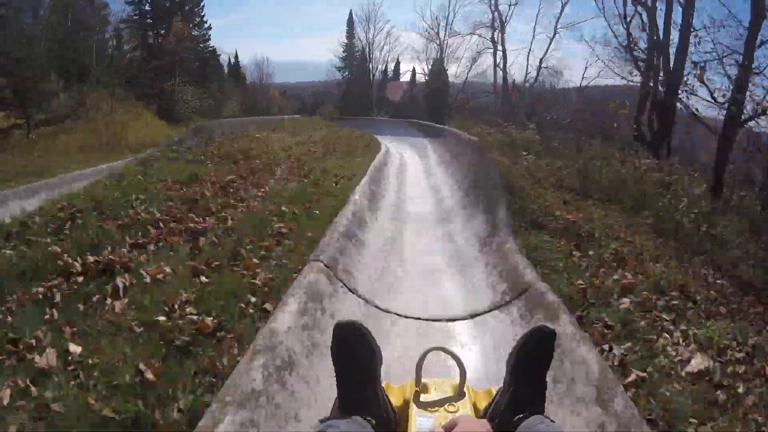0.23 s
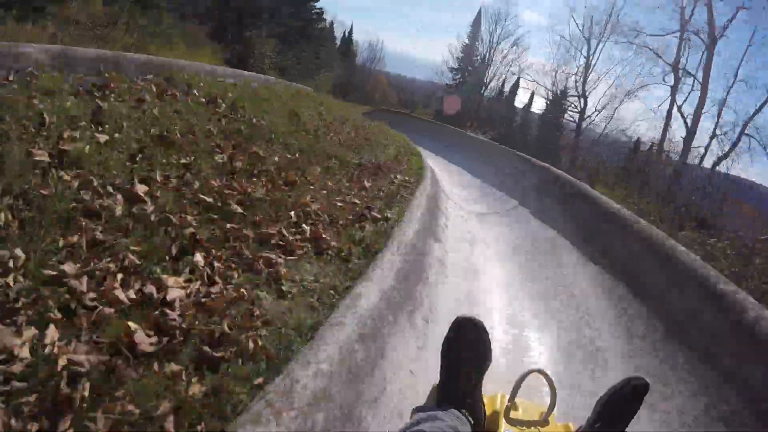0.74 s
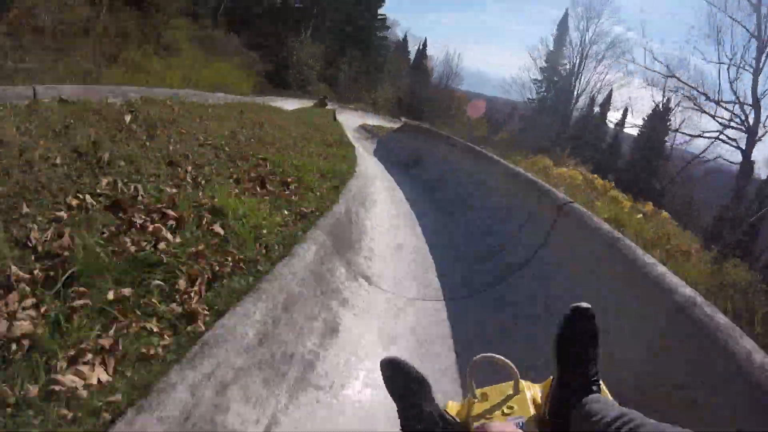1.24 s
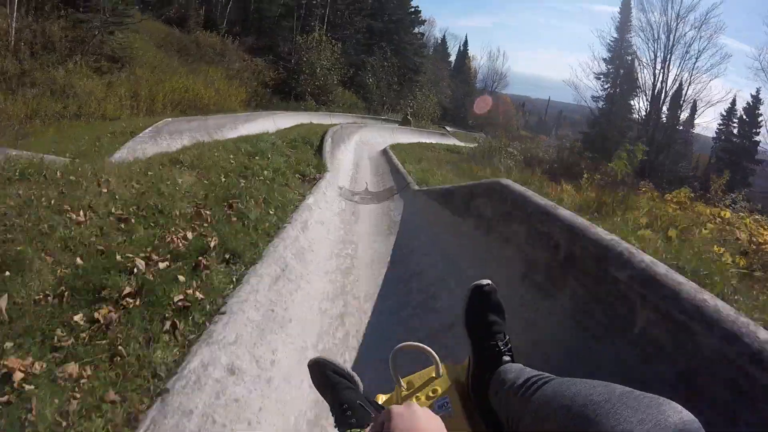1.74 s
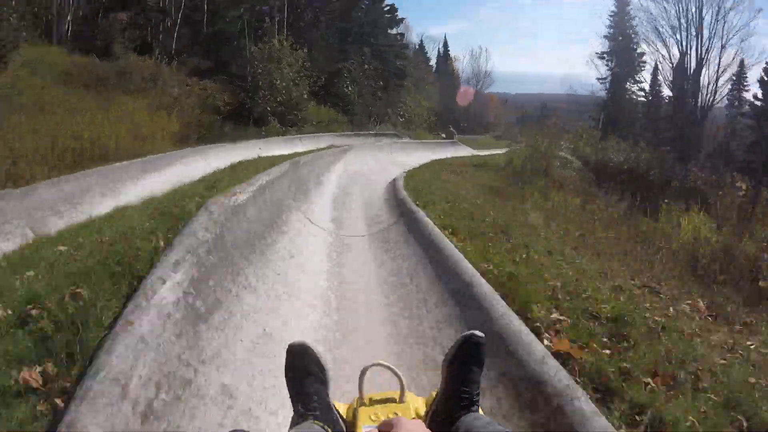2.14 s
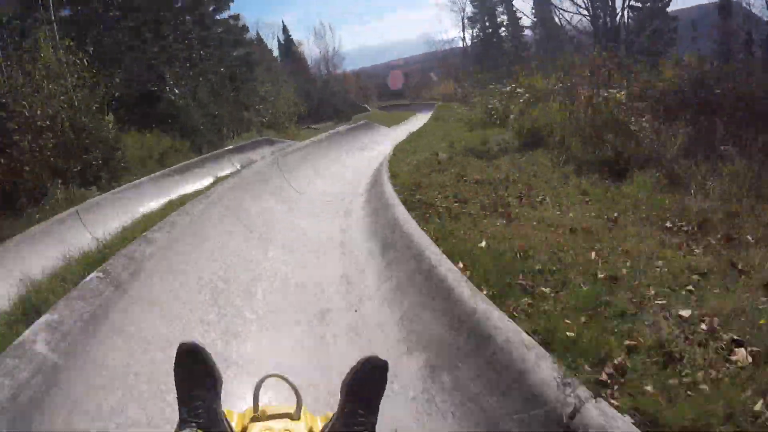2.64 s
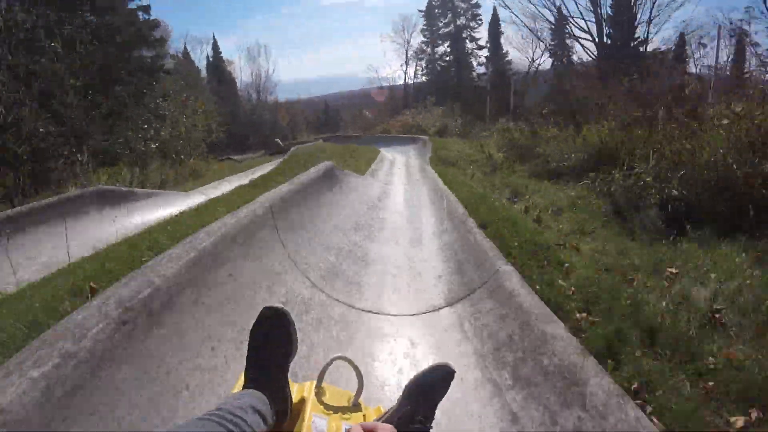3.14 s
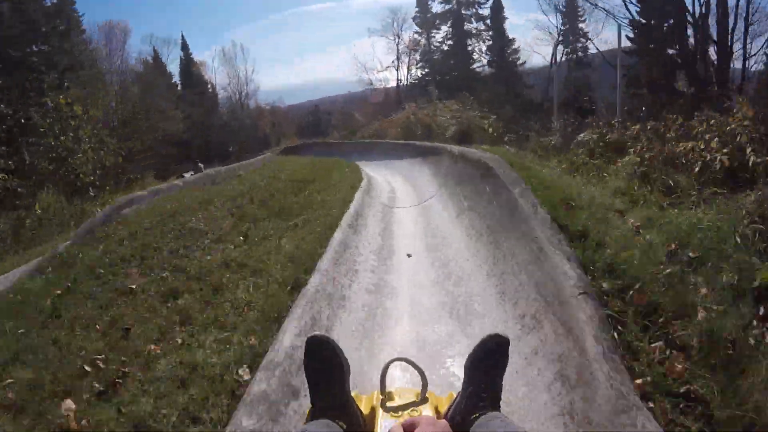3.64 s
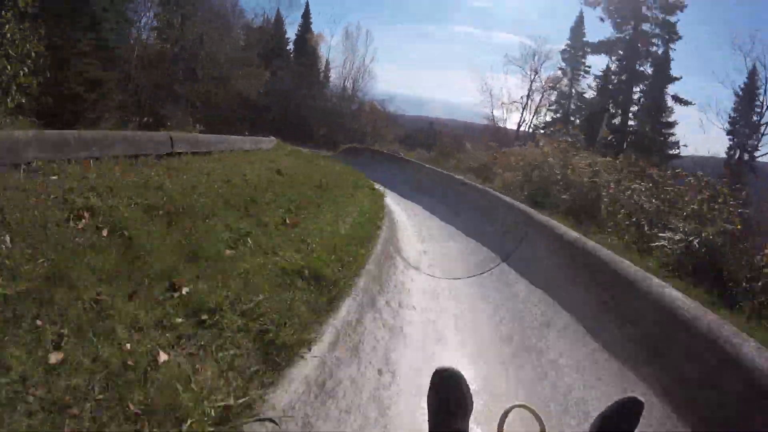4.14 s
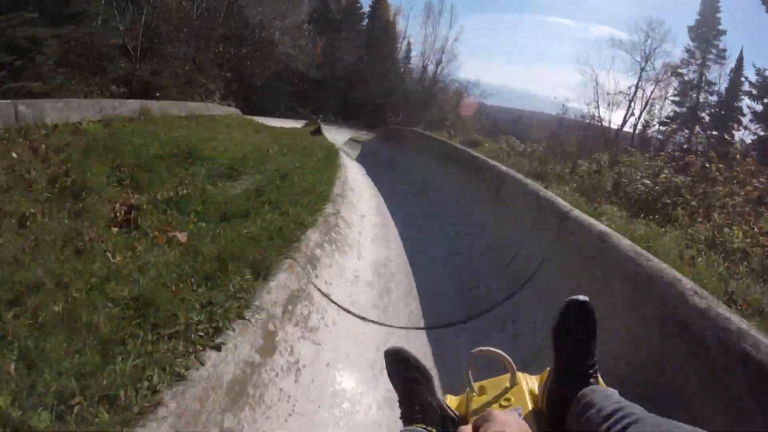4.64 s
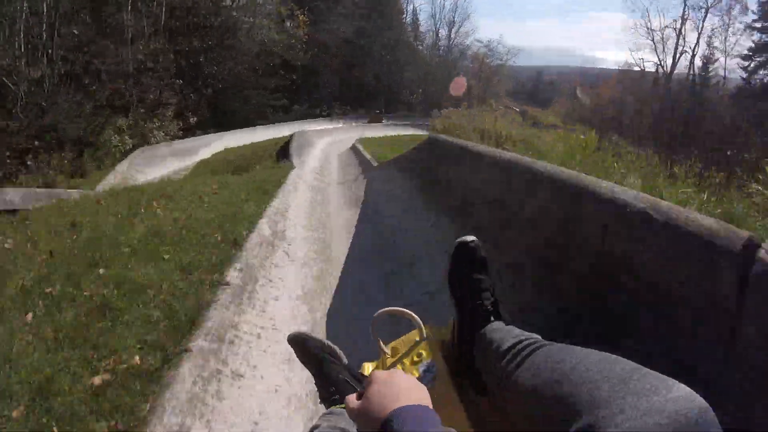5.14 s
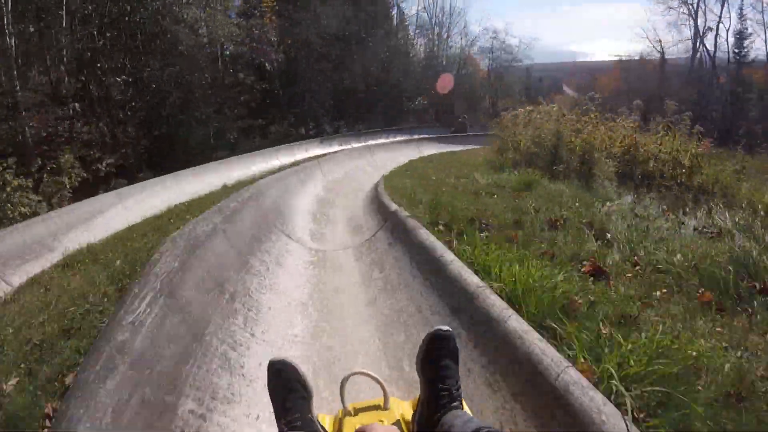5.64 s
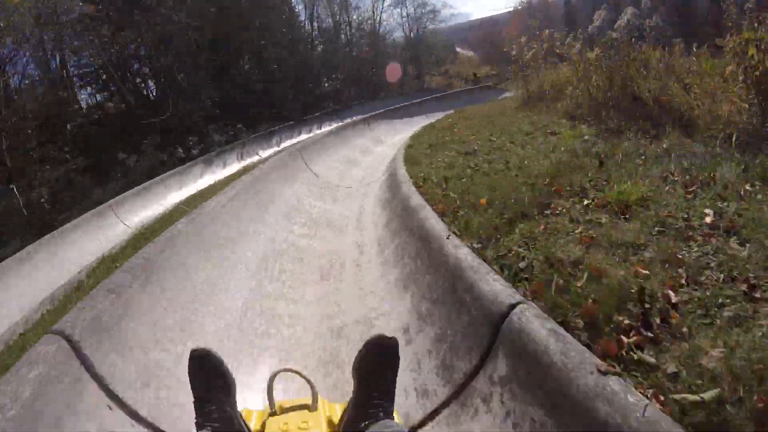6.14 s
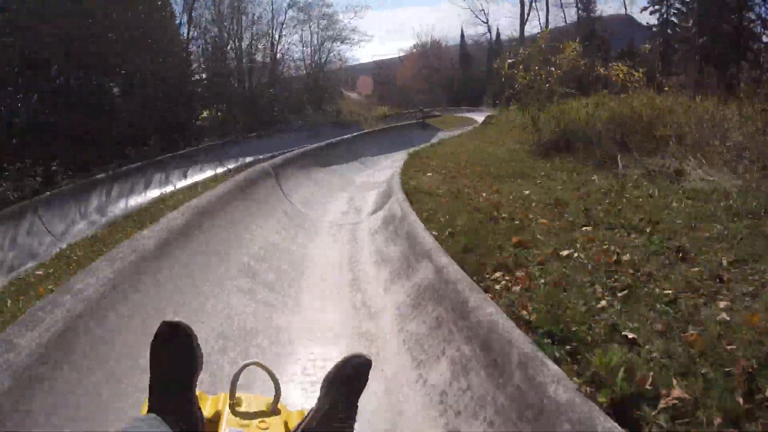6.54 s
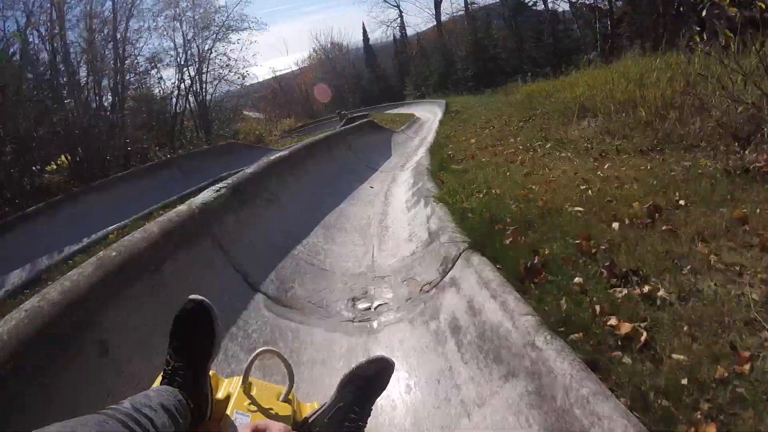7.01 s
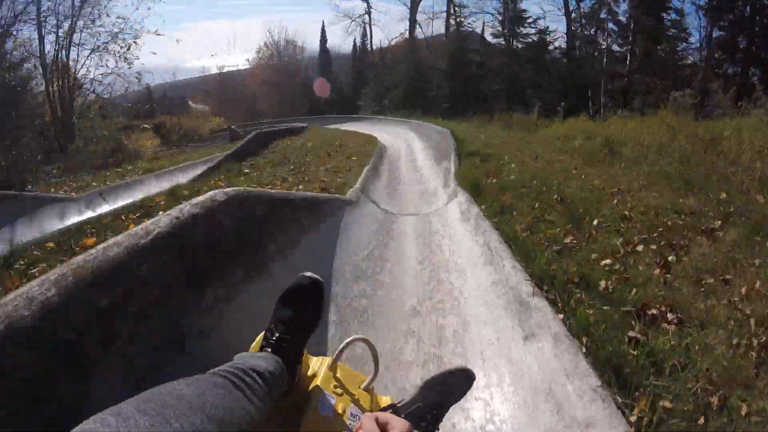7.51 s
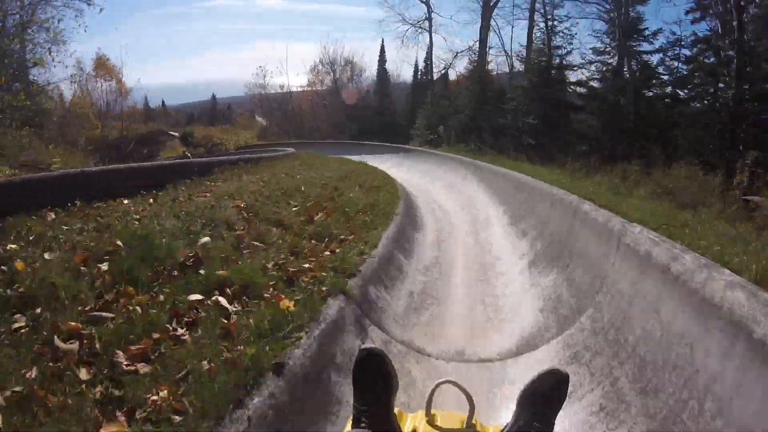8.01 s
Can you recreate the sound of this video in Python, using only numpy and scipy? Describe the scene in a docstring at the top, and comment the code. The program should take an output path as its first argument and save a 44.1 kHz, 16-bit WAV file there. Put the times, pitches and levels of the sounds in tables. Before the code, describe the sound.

Close, dry outdoor sound from a microphone on the rider of a wheeled plastic sled running down concrete. From the start a hollow, uneven rumble and gritty rasp continue without pause, while low wind gusts thud and flutter, strongest in the first second, near 2.8 and around 4. Joints knock at 0.5, 1.1, 1.45 and 2.2 s, with a soft shudder just after. From 2.6 to 3.6 rough scrapes, rattles and stone clicks crowd together. A thump at 4.45 leads to a very hard, clipped knock at 4.85; the level ducks and slowly returns. Two thin sandy skids hiss near 5.45 and 5.5 with a wind puff. Clustered knocks and rattles come at 6.1-6.7, scrapes near 7, then the hardest, ringing plastic bang at 7.2 and another knock at 7.5. A double tap near 7.95, wind rising, still rolling at about 8.3.

```python
"""Riding a wheeled plastic sled fast down a concrete chute, with the microphone on the rider, about 8 s.
From the start filtered taps rumble in the hollow shell, grit rasps, and turbulent noise buffets the microphone.
Damped resonances thump at the joints, a shudder just after; loose parts rattle and runners scrape.
Past the middle comes the first very hard knock, then two sandy skids, then the hardest knock of all.
Loud knocks duck the microphone's gain, which recovers slowly; the hardest overload it. It ends still rolling."""
import sys
import numpy as np
from scipy import signal
from scipy.fft import rfft, irfft
from scipy.io import wavfile
from scipy.ndimage import uniform_filter1d

SR = 44100
rng = np.random.default_rng(int(sys.argv[2]) if len(sys.argv) > 2 else 0)


def transcribe(signal):
    """Save signal, clipped to [-1, 1], as a 16-bit WAV file at the path in sys.argv[1]."""
    frames = np.atleast_2d(signal).T
    limited = np.clip(frames, -1, 1)
    pcm = np.round(limited * 32767).astype(np.int16)
    wavfile.write(sys.argv[1], SR, pcm)


N = 364707
TIME = np.arange(N) / SR


def gain_of(db):
    """Decibels as an amplitude factor."""
    return 10 ** (np.asarray(db) / 20)


def evened(x):
    """Scale to unit RMS."""
    return x / np.sqrt(np.mean(x ** 2) + 1e-20)


def steadied(x, steady_s):
    """Divide out the running RMS, so that only level changes faster than the given time remain."""
    power = abs(uniform_filter1d(x ** 2, int(steady_s * SR)))
    return x / np.sqrt(power + 1e-9)


def levels(rows):
    """Each dB column of a curve as a gain for every sample."""
    s, *columns = np.transpose(rows)
    return [gain_of(np.interp(TIME, s, column)) for column in columns]


def swells(rows):
    """Bell-shaped swells of gain, each down to 1/e one half length from its height."""
    return sum(gain_of(db) * np.exp(-((TIME - s) / half) ** 2) for s, half, db in rows)


def add(mix, s, sound):
    """Lay a short sound into the mix at the given time."""
    part = mix[max(round(s * SR), 0):][:len(sound)]
    part += sound[:len(part)]


def colour(x, points, size=8192):
    """Causal minimum-phase filter of unit energy with the given spectrum."""
    hz, db = np.transpose(points)
    f = abs(np.fft.fftfreq(size, 1 / SR))
    log_gain = np.log(gain_of(np.interp(np.log(f + 1), np.log(hz), db)))
    minimum_phase = np.exp(np.conj(signal.hilbert(log_gain)))
    response = np.fft.ifft(minimum_phase).real[:size // 2]
    return signal.oaconvolve(x, response / np.linalg.norm(response))[:len(x)]


def wander(hz):
    """Slow random drift of unit RMS, fading out above the given rate."""
    f = np.fft.rfftfreq(N, 1 / SR)
    spectrum = rfft(rng.standard_normal(N)) / (1 + (f / hz) ** 4)
    return evened(irfft(spectrum, N))


def grains(per_s, spread_db):
    """Tiny impacts at random moments, a few much larger than the rest."""
    size = gain_of(spread_db * np.minimum(rng.exponential(1, N), 4))
    struck = rng.random(N) < per_s / SR
    return evened(size * rng.choice([-1., 1.], N) * struck)


def strike_shape(rise_s, decay_s, size):
    """Envelope of a blow: a quick rise and an exponential fall, with a peak of 1."""
    t = np.arange(size) / SR
    shape = (1 - np.exp(-t / rise_s)) ** 2 * np.exp(-t / decay_s)
    return shape / shape.max()


def burst(rise_s, decay_s, size=4096):
    """A puff of noise that swells and dies."""
    return strike_shape(rise_s, decay_s, size) * rng.standard_normal(size)


def pluck(hz, rise_s, decay_s, size=6144):
    """A struck resonance that rises quickly and rings away."""
    t = np.arange(size) / SR
    return strike_shape(rise_s, decay_s, size) * np.sin(2 * np.pi * hz * t)


def chatter(rise_s, decay_s, per_s, size=4096):
    """A quick run of separate tiny hits that dies away."""
    hits = rng.choice([-1., 1.], size) * (rng.random(size) < per_s / SR)
    return strike_shape(rise_s, decay_s, size) * hits * np.sqrt(SR / per_s)


def ring(hz, swell_s, size=4096):
    """A heavily damped resonance that swells and dies."""
    t = np.arange(size) / SR
    shape = (t / swell_s) ** 2 * np.exp(-t / swell_s)
    return shape / shape.max() * np.sin(2 * np.pi * hz * t)


def eddies(spectrum, steady_s):
    """Turbulent pressure: coloured noise of evened strength."""
    return steadied(colour(rng.standard_normal(N), spectrum), steady_s)


def rolling(spectrum, per_s, spread_db, steady_s):
    """A stream of tiny impacts heard through a body, of evened strength."""
    return steadied(colour(grains(per_s, spread_db), spectrum), steady_s)


# strength of the wind over the microphone: (time [s], relative level [dB])
WIND_STRENGTH = [(0, -16.5), (.11, -25), (.38, -17), (.58, -18.5), (.75, -19.5), (1.05, -20.5), (1.3, -24),
                 (1.65, -20), (2.05, -22.5), (2.5, -23), (2.77, -17), (3.05, -22), (3.3, -22.5),
                 (3.52, -20), (3.95, -17), (4.25, -16.5), (4.55, -19.5), (4.8, -19), (4.95, -23),
                 (5.3, -29), (5.52, -17.5), (5.85, -28), (6.2, -22.5), (6.6, -25), (7.1, -24.5),
                 (7.5, -25.5), (8, -22), (8.2, -17)]
# gusts rushing close past the microphone: (time of height [s], half length [s], level before flicker [dB])
GUSTS = [(0.692, 0.032, -42), (4.24, 0.17, -44), (4.56, 0.032, -36.5), (8.26, 0.045, -55)]
# spectra of large eddies, small eddies and rushing air: (frequency [Hz], relative density [dB per Hz])
BUFFET_SPECTRUM = [(8, -10.5), (20, -1), (32, -4), (58, -1), (80, -8.5), (120, -7.5), (300, -67),
                   (1500, -115)]
FLUTTER_SPECTRUM = [(40, -23), (70, 4), (100, 3.5), (160, 2.5), (210, -4), (300, -9.5), (700, -47),
                    (3000, -115)]
AIR_SPECTRUM = [(600, -12), (1200, 6), (2000, 1.5), (3000, -9.5), (4000, -20), (5500, -25.5), (7500, -28.5),
                (12000, -41.5), (16000, -65.5)]


def wind(buffet_db=-3, buffet_follow=0.49, flutter_db=-3, breeze_db=-20, air_db=-43, flicker_db=3):
    """Large and small eddies push on the microphone, the small ones following the wind most; air rushes."""
    speed, = levels(WIND_STRENGTH)
    # large eddies follow the wind by a power below 1, around the breeze level
    deep = gain_of(breeze_db + buffet_db) * (speed / gain_of(breeze_db)) ** buffet_follow
    buffet = deep * eddies(BUFFET_SPECTRUM, steady_s=0.11)
    flutter = gain_of(flutter_db) * speed * eddies(FLUTTER_SPECTRUM, steady_s=0.078)
    rush = gain_of(air_db) * speed + swells(GUSTS)
    flicker = gain_of(flicker_db * wander(hz=50))
    return buffet + flutter + rush * flicker * eddies(AIR_SPECTRUM, steady_s=.1)


# large eddies striking the microphone: (time [s], pitch [Hz], level [dB])
BUFFET_LUMPS = [(0.274, 74.4, -10), (.35, 55, -17), (0.382, 65, -12.5), (0.451, 112, -6.5), (0.699, 96, -8),
                (2.069, 69, -10), (2.138, 75.5, -10), (2.345, 107, -10.5), (2.537, 49, -16),
                (2.791, 89, -4.5), (3.527, 68, -9.5), (3.684, 97, -21), (3.859, 60.6, -16),
                (3.934, 110, -11), (3.993, 126, -13), (5.481, 82.4, -13.5), (8.187, 110, -11)]


def buffets(cycles=0.7, size=8192):
    """Single large eddies hit the microphone, each a soft lump of pressure of a cycle or two."""
    out = np.zeros(N)
    t = (np.arange(size) - size // 2) / SR
    for s, hz, db in BUFFET_LUMPS:
        shape = np.exp(-(t * hz / cycles) ** 2)
        lump = shape * np.sin(2 * np.pi * (hz * t + rng.random()))
        add(out, s + t[0], gain_of(db) * lump)
    return out


# larger stones clicking under the sled: (time [s], level [dB])
STONES = [(.1965, -51), (.379, -44), (2.1755, -39), (2.84, -34), (3.1434, -33.5), (3.3017, -39),
          (3.2125, -47), (3.3845, -42), (3.8496, -43), (3.935, -43), (4.019, -41), (4.857, -48),
          (5.267, -41), (5.3575, -43), (6.0612, -44), (6.163, -38), (6.3779, -37), (6.4832, -40.5),
          (6.938, -46), (6.9775, -35), (7.0142, -34), (7.9363, -39)]
# spectrum of a stone's click: (frequency [Hz], relative density [dB per Hz])
CLICK_SPECTRUM = [(1200, 2), (2400, 9.5), (3700, 5), (4700, -3.5), (6400, -0.5), (8200, -20), (11000, -26),
                  (14000, -38.5)]


def stones(count=14, crumb_db=-48, spread_db=4):
    """Stones snap against the underside, short and dry; more, called crumbs, strike at random."""
    crumbs = [(rng.uniform(0, N / SR), crumb_db + spread_db * rng.standard_normal()) for _ in range(count)]
    clicks = np.zeros(N)
    for s, db in list(STONES) + crumbs:
        add(clicks, s, gain_of(db) * burst(rise_s=0.00034, decay_s=0.0019))
    return colour(clicks, CLICK_SPECTRUM)


# wheels slipping sideways: (time of height [s], half length [s], level before flicker [dB])
SKIDS = [(5.437, 0.036, -50.5), (5.523, 0.022, -50.5)]
# spectrum of a skid: (frequency [Hz], relative density [dB per Hz])
SKID_SPECTRUM = [(1800, -24), (3000, -4), (3700, 1), (4500, -11), (6300, -9), (8000, -29), (14000, -52)]


def skids(flicker_db=3):
    """The wheels slip sideways with a thin, sandy hiss of dense tiny impacts."""
    flicker = gain_of(flicker_db * wander(hz=60))
    sand = rolling(SKID_SPECTRUM, per_s=5000, spread_db=4.0, steady_s=.03)
    return swells(SKIDS) * flicker * sand


# runners scraping the concrete: (time of height [s], half length [s], level before roughness [dB])
SCRAPES = [(0.177, 0.051, -45.5), (2.608, 0.024, -34), (2.71, 0.079, -40), (2.873, 0.044, -41.5),
           (2.935, 0.056, -39), (3.067, 0.029, -40.5), (3.223, 0.0096, -34), (3.392, 0.0099, -35),
           (3.435, 0.026, -43), (3.587, 0.04, -35), (4.165, 0.024, -38.5), (4.31, 0.061, -40),
           (5.37, 0.012, -52), (6.773, .015, -33), (6.866, 0.021, -36), (7.023, 0.011, -29),
           (7.451, 0.013, -39.5)]
# spectrum of a scrape: (frequency [Hz], relative density [dB per Hz])
SCRAPE_SPECTRUM = [(600, -6), (950, 2.5), (1180, 3), (1500, -10), (2100, -8), (2650, -15), (3000, -20.5),
                   (3700, -19), (4500, -29.5), (6500, -26), (12000, -57)]


def scrapes(rough_db=3.0, hollow_hz=1080, hollow_width_hz=220, drift=.09, hollow_db=-3):
    """The runners rasp in short, rough swells; a hollow resonance shifts as the shell flexes."""
    # a low-pass resonator driven by grains is turned up to the drifting pitch
    pitch_hz = hollow_hz * (1 + drift * wander(hz=14))
    turn = np.exp(2j * np.pi * np.cumsum(pitch_hz) / SR)
    r = np.exp(-np.pi * hollow_width_hz / SR)
    resonance = signal.lfilter([1], [1, -2 * r, r * r], grains(per_s=2600, spread_db=0.5))
    hollow = evened((turn * resonance).real)
    rasp = rolling(SCRAPE_SPECTRUM, per_s=1600, spread_db=4.0, steady_s=0.032)
    roughness = gain_of(rough_db * wander(hz=90))
    return swells(SCRAPES) * roughness * (rasp + gain_of(hollow_db) * hollow)


# loose parts of the sled rattling: (time [s], body level [dB], clatter level [dB])
RATTLES = [(0.1953, -18.5, -37), (0.4397, -18, -40), (1.3314, -26.5, -55.5), (1.405, -23, -41),
           (1.417, -16.5, -37), (1.761, -22, -40), (1.8909, -22, -35.5), (2.141, -23, -32.5),
           (2.4552, -20, -44), (2.6149, -35, -36), (2.84, -27, -34), (2.908, -17, -35), (2.917, -16, -33),
           (2.991, -19.5, -33), (3.001, -18, -36), (3.0422, -25, -40), (3.1447, -17, -39),
           (3.211, -20, -36), (3.3844, -25, -42), (3.4982, -35, -34), (3.7645, -18, -43),
           (5.1024, -21.5, -39), (5.27, -21, -41), (5.358, -20, -36), (5.4013, -19, -39),
           (6.0614, -16, -33), (6.076, -26, -33.5), (6.1637, -19, -33), (6.3343, -21.5, -50),
           (6.3802, -17, -33.5), (6.6235, -20, -38), (6.938, -25, -35), (6.978, -19.5, -29.5),
           (7.024, -17.5, -31), (7.069, -32, -35), (7.4515, -34, -38), (7.937, -19, -30),
           (7.9635, -24, -43)]


def rattles(tick_db=-20):
    """Loose parts shake briefly through the same body as the wheels; a fine tick goes with the clatter."""
    clatter, body, tick = np.zeros((3, N))
    for s, body_db, clatter_db in RATTLES:
        add(clatter, s, gain_of(clatter_db) * chatter(rise_s=0.00044, decay_s=0.011, per_s=900))
        add(body, s, gain_of(body_db) * burst(rise_s=0.00065, decay_s=0.016))
        add(tick, s, gain_of(clatter_db + tick_db) * chatter(rise_s=0.0006, decay_s=0.014, per_s=1800))
    return colour(clatter, GRIT_SPECTRUM) + colour(body, ROAR_SPECTRUM) + colour(tick, RUB_SPECTRUM)


# brief hollow tones standing out of the rolling rumble: (time [s], pitch [Hz], level [dB], decay [s])
HOLLOW_TONES = [(.843, 768, -17.5, 0.0098), (1.08, 261, -14.5, 0.023), (1.14, 584, -14.5, .012),
                (1.327, 661, -12.5, 0.011), (1.337, 320, -18, 0.01), (1.762, 746, -17, .01),
                (1.781, 282, -6, 0.0095), (1.81, 815, -19, 0.015), (1.893, 635, -18, 0.0082),
                (2.076, 268, -18, 0.01), (2.181, 287, -11.5, 0.016), (2.457, 870, -20, 0.0068),
                (2.612, 345, -19, .014), (2.738, 258, -6, 0.011), (2.752, 627, -20, 0.01),
                (3.221, 419, -8.5, 0.0074), (3.406, 266, -9, 0.0084), (3.598, 534, -9, 0.0069),
                (3.718, 720, -17, 0.0095), (3.767, 322, -13.5, 0.016), (3.95, 273, -17.5, 0.013),
                (4.408, 735, -18, 0.02), (5.065, 690, -15.5, 0.0083), (5.15, 255, -9.5, 0.016),
                (5.402, 868, -20, 0.016), (5.507, 570, -17.5, 0.015), (5.608, 342, -12, 0.015),
                (5.66, 356, -9.5, 0.013), (5.758, 274, -14, 0.02), (5.847, 295, -16.5, 0.0096),
                (6.0615, 837, -10, 0.008), (6.066, 322, -15.5, 0.014), (6.124, 273, -16.5, 0.022),
                (6.245, 344, -15.5, .014), (6.643, 262, -9, .014), (7.089, 307, -13.5, .014),
                (7.875, 290, -15, 0.02), (7.949, 758, -15.5, 0.013), (7.954, 577, -16.5, 0.01)]


def hollow_tones(count=36, small_db=-16.0, spread_db=2.5, low_hz=235, high_hz=880,
                 fall_db_per_octave=6.0, small_decay_s=0.012):
    """Short hollow tones stand out of the rumble for a few hundredths of a second; more come at random."""
    small = []
    for when, which, size in rng.random((count, 3)):
        hz = low_hz * (high_hz / low_hz) ** which
        db = small_db + spread_db * (2 * size - 1) - fall_db_per_octave * np.log2(hz / low_hz)
        small.append((when * N / SR, hz, db, small_decay_s))
    out = np.zeros(N)
    for s, hz, db, decay_s in list(HOLLOW_TONES) + small:
        add(out, s, gain_of(db) * pluck(hz, rise_s=0.0011, decay_s=decay_s))
    return out


def jolts(per_s, settle_s, rise_s=0.001):
    """Unevenness of the track: random sudden jolts that settle quickly, of unit RMS around zero."""
    kicks = rng.exponential(1, N).clip(0, 2) * (rng.random(N) < per_s / SR)
    t = np.arange(8192) / SR
    settling = (1 - np.exp(-t / rise_s)) ** 3 * np.exp(-t / settle_s)
    x = signal.oaconvolve(kicks, settling)[:N]
    return evened(x - uniform_filter1d(x, size=6000))


# wheels on the track, before the jolts: (time [s], shell drone level [dB], wheel roar level [dB])
RIDE = [(0, -31, -29.5), (.55, -24, -27.5), (1.65, -23, -28.5), (1.97, -28.5, -29.5), (2.1, -18.5, -24.5),
        (2.3, -27.5, -31), (2.53, -27.5, -33.5), (2.6, -25, -21.5), (2.75, -16, -24.5), (2.9, -20.5, -21),
        (3.1, -27, -26.5), (3.6, -23, -26), (3.88, -28, -33), (4.06, -25, -28), (4.13, -21, -26),
        (4.22, -25.5, -25), (4.33, -22, -28.5), (4.41, -21.5, -24.5), (4.7, -26.5, -30),
        (4.97, -26.5, -30.5), (5.1, -19, -28.5), (5.34, -33.5, -35), (5.6, -17, -29), (6.05, -29, -32.5),
        (6.09, -25.5, -27.5), (7.15, -24, -26.5), (7.7, -30.5, -29), (8.25, -25, -32.5)]
# grit and rubbing close under the sled, before the jolts: (time [s], rasp level [dB], hiss level [dB])
RUBBING = [(0, -49.5, -62.5), (1.1, -44.5, -60.5), (1.2, -46.5, -64), (1.7, -44, -60), (1.87, -52, -64),
           (1.91, -49, -58), (2.18, -41, -58), (2.26, -51, -68), (2.34, -46.5, -60), (2.55, -49, -59.5),
           (2.62, -41, -57), (3.56, -43.5, -59), (3.92, -50, -68.5), (4.25, -42, -61.5), (4.7, -45.5, -65),
           (5.345, -51, -64), (5.365, -47.5, -57.5), (5.52, -42.5, -57), (5.66, -46, -63.5),
           (6.055, -50.5, -60.5), (6.15, -44.5, -60.5), (6.75, -45.5, -63), (7.02, -42.5, -60.5),
           (7.35, -44, -65.5), (7.75, -43, -56.5), (7.92, -50, -66), (8.1, -50.5, -60.5), (8.25, -43, -66)]
# spectra of shell, wheels, grit and rubbing: (frequency [Hz], relative density [dB per Hz])
DRONE_SPECTRUM = [(100, -25.5), (190, -1.5), (268, 2), (310, -2), (380, -1), (460, -7), (600, -18.5),
                  (1200, -58.5), (5000, -110)]
ROAR_SPECTRUM = [(250, -20.5), (420, -0.5), (520, 1), (620, 1), (830, 0.5), (980, -6.5), (1150, -17.5),
                 (1500, -27.5), (2200, -41), (5000, -71), (14000, -110)]
GRIT_SPECTRUM = [(600, -10), (1100, 7), (1450, -0.5), (1800, -4), (2600, -6), (2900, -15), (3300, -12.5),
                 (3750, -9.5), (4200, -28.5), (4800, -36), (8000, -61), (15000, -87.5)]
RUB_SPECTRUM = [(2500, -14), (4000, -1.5), (4800, -7), (5700, 1.5), (6800, -0.5), (7500, -11), (8400, -14),
                (10000, -12.5), (10900, -18.5), (12000, -16.5), (13200, -37.5), (16000, -51.5)]


def wheels():
    """The rough concrete taps the wheels; its bumps press shell, wheels, grit and hiss together."""
    drone, roar = levels(RIDE)
    rasp, hiss = levels(RUBBING)
    bumps = jolts(per_s=120, settle_s=0.01)
    sway, scuffs = wander(hz=12.0), wander(hz=70)
    # the factors are dB per unit of each movement
    drone = drone * gain_of(1.0 * bumps + 2.96 * sway)
    roar = roar * gain_of(1.8 * bumps)
    rasp = rasp * gain_of(1.82 * bumps)
    hiss = hiss * gain_of(1.9 * bumps + 1.4 * scuffs)
    return (drone * rolling(DRONE_SPECTRUM, per_s=2500, spread_db=1, steady_s=0.065)
            + roar * rolling(ROAR_SPECTRUM, per_s=4000, spread_db=1, steady_s=0.21)
            + rasp * rolling(GRIT_SPECTRUM, per_s=5000, spread_db=2.5, steady_s=0.026)
            + hiss * rolling(RUB_SPECTRUM, per_s=17000, spread_db=1.5, steady_s=0.067))


# wheels striking a joint or a break in the concrete (the knocks at 6.3323 and 6.340 s are rear wheels):
# (time [s], thump peak level [dB], thump pitch [ratio], crack level [dB],
# panel ring level before trim [dB], following shudder level [dB])
JOINTS = [(0.1514, -6.5, 1.17, -44, -45, -19.5), (0.4869, 1.5, 0.81, -21.5, -42, -29),
          (1.1408, -1, 1.08, -32.5, -39, -30), (1.4516, 5.5, 0.95, -24, -37, -11),
          (2.1867, -3.5, 0.825, -31, -35, -23), (3.603, -14, 1, -38, -36, -26),
          (4.4549, 1, 0.93, -25.5, -46, -9), (4.843, 9.5, 1.05, -18.5, -17, -10),
          (6.2884, -6.5, 1.04, -30, -36, -24), (6.3323, -3.5, 0.81, -43, -47, -27),
          (6.340, -7, 0.98, -29, -45, -17), (6.655, 0.5, 0.8, -25.5, -44, -28),
          (7.2137, 10, 1.06, -15, -4.5, -9), (7.5161, 2.5, 1.02, -18, -29, -8.5),
          (7.9565, -10.5, 1.6, -32, -29, -32), (7.9645, -6.5, 1.17, -26.5, -41, -28)]
# broad resonances of the shell at pitch ratio 1: (frequency [Hz], relative level [dB], time to swell [s])
THUMP_MODES = [(263, -9.5, 0.0015), (369.5, 0.5, 0.001), (726, -9.5, 0.00096)]
# plastic panels ringing on, before detuning: (frequency [Hz], relative level [dB], decay [s])
PANELS = [(1097, 0.5, 0.0037), (1230, 1, 0.0042), (1410, -4.5, 0.0073), (1654, -1.5, 0.0025),
          (1990, -4.5, 0.0022), (2440, -13, 0.003), (3050, -9, 0.0013), (3970, -15, 0.0016),
          (4500, -19, 0.001)]
# spectrum of a crack: (frequency [Hz], relative density [dB per Hz])
CRACK_SPECTRUM = [(300, -32), (800, 8), (1400, 2), (2000, -6), (3000, -13.5), (3700, -8), (4800, -22.5),
                  (6200, -15), (8200, -30), (12000, -39), (16000, -65.5)]


def joints(after_s=.051, after_crack_db=-19, after_roar_db=-8, tail_db=-12,
           detune=0.04, panel_trim_db=-7.5, uneven_db=2.5):
    """Each knock thumps, cracks, rings and chatters; a softer shudder and crack follow it."""
    body, cracks, tails, shudder = np.zeros((4, N))
    for s, blow_db, pitch, edge_db, ring_db, shudder_db in JOINTS:
        thump = -sum(gain_of(db) * ring(hz * pitch, swell / pitch) for hz, db, swell in THUMP_MODES)
        add(body, s, gain_of(blow_db) * thump / abs(thump).max())
        for k, (hz, db, decay) in enumerate(PANELS):
            strength = gain_of(ring_db + db + panel_trim_db + uneven_db * rng.uniform(-1, 1))
            tuning = 1 + detune * rng.uniform(-1, 1)
            sign = (-1) ** k  # neighbouring panels start in opposite directions
            add(body, s, sign * strength * pluck(hz * tuning, rise_s=0.00036, decay_s=decay))
        add(cracks, s, gain_of(edge_db) * burst(rise_s=0.00067, decay_s=0.0015))
        add(tails, s, gain_of(edge_db + tail_db) * chatter(rise_s=.002, decay_s=0.0066, per_s=1300))
        add(shudder, s + after_s, gain_of(shudder_db) * chatter(rise_s=0.0011, decay_s=0.0039, per_s=2300))
        after_crack = burst(rise_s=.00065, decay_s=0.0047)
        add(cracks, s + after_s, gain_of(edge_db + after_crack_db) * after_crack)
    after = colour(shudder, DRONE_SPECTRUM) + gain_of(after_roar_db) * colour(shudder, ROAR_SPECTRUM)
    return body + colour(cracks, CRACK_SPECTRUM) + colour(tails, GRIT_SPECTRUM) + after


def scene():
    """Wind, grit, rolling and knocks, all close to the one microphone."""
    air = wind() + buffets()
    underside = stones() + skids() + scrapes()
    sled = rattles() + hollow_tones() + wheels() + joints()
    return (air + underside + sled)[None]


EDGE_HZ = 15600  # upper band limit


def record(dry, threshold_db=-9.0, recover_db_per_s=36, lag_s=0.00039, attack_s=0.0032,
           squeeze=0.64, deepest_db=9.5, ceiling=.71):
    """Gain ducks just after a loud peak and recovers slowly; soft clipping and a band limit follow."""
    over_db = np.clip(20 * np.log10(abs(dry[0]) + 1e-9) - threshold_db, 0, deepest_db)
    # the excess over the threshold is held and falls steadily; squeeze then scales it
    fall = TIME * recover_db_per_s
    held_db = np.maximum.accumulate(over_db + fall) - fall
    late_db = np.interp(TIME - lag_s, TIME, held_db)
    r = np.exp(-1 / (attack_s * SR))
    ducked = dry / gain_of(squeeze * signal.lfilter([1 - r], [1, -r], late_db))
    clipped = ducked / (1 + (ducked / ceiling) ** 8) ** (1 / 8)
    band_limit = signal.firwin(255, EDGE_HZ, window=("kaiser", 9), fs=SR)
    return signal.oaconvolve(clipped, band_limit[None], "same")


dry = scene()
out = record(dry)
transcribe(out)
```